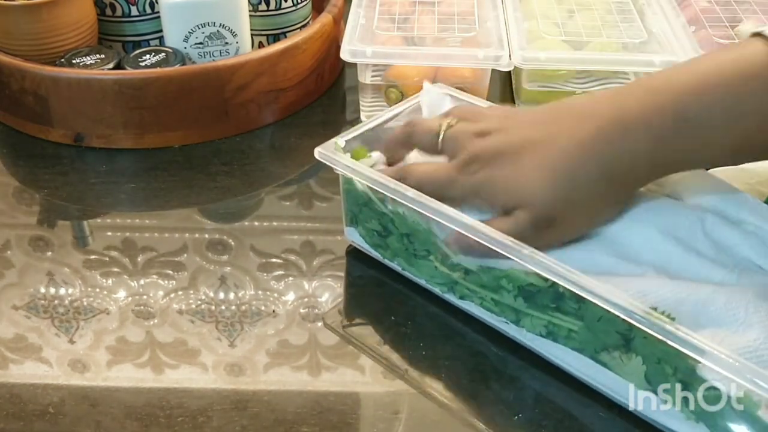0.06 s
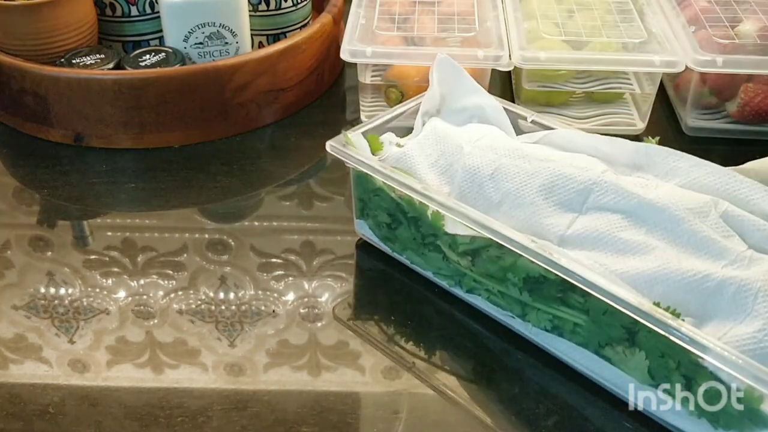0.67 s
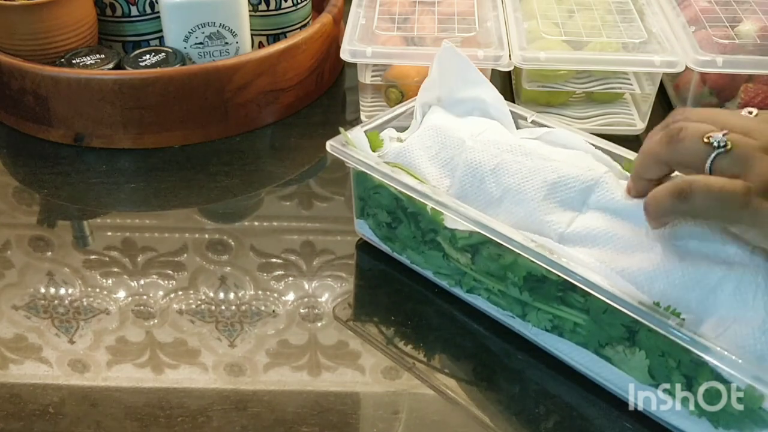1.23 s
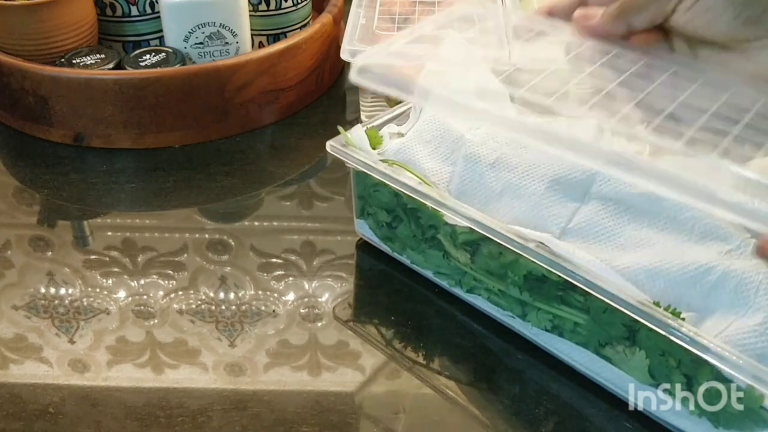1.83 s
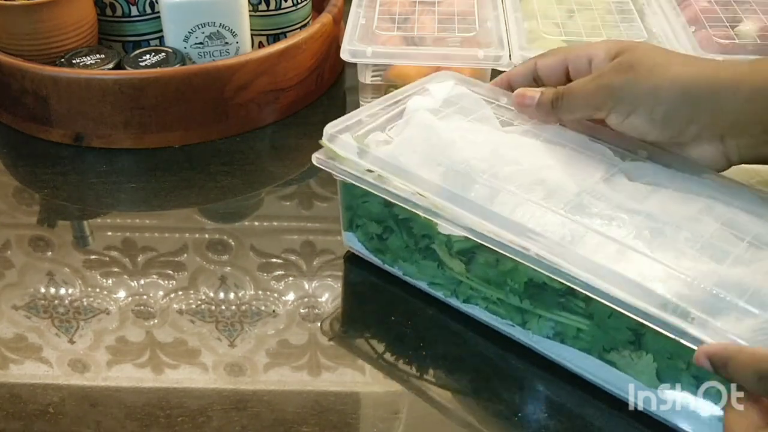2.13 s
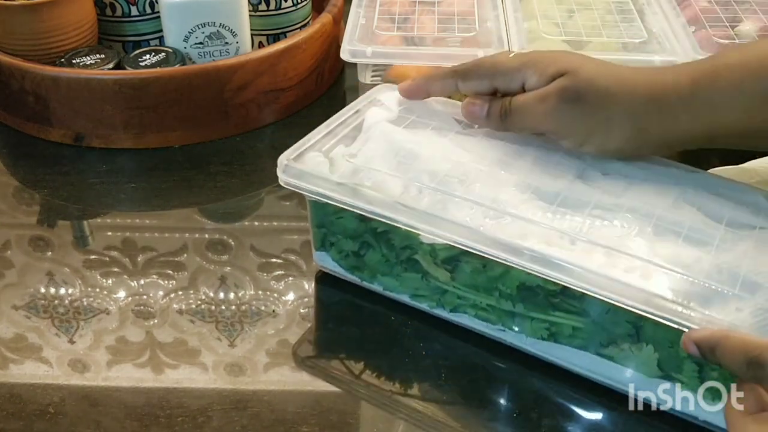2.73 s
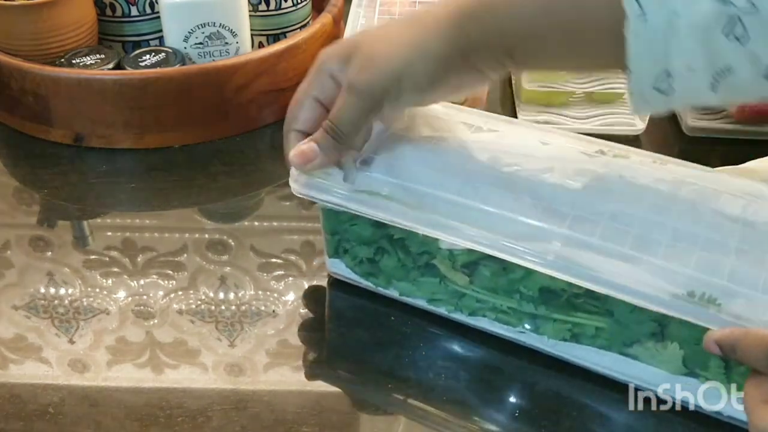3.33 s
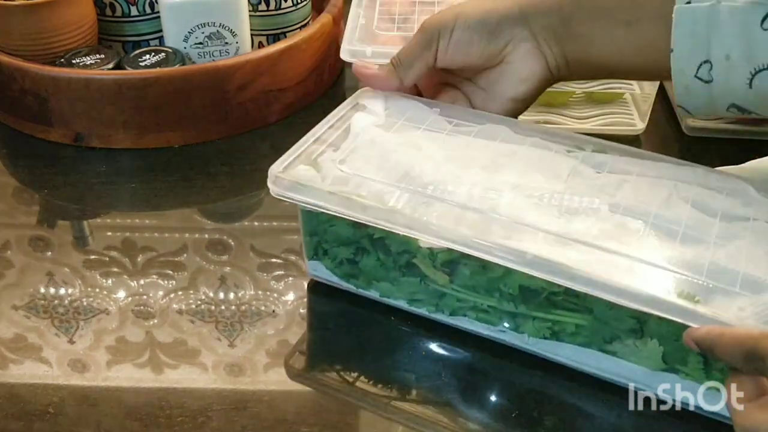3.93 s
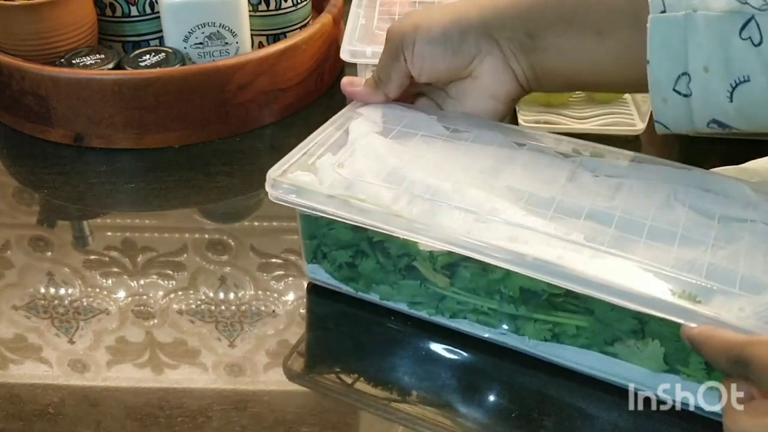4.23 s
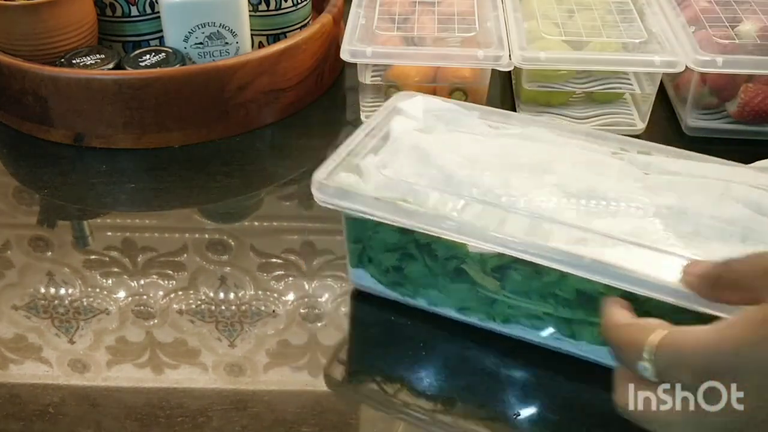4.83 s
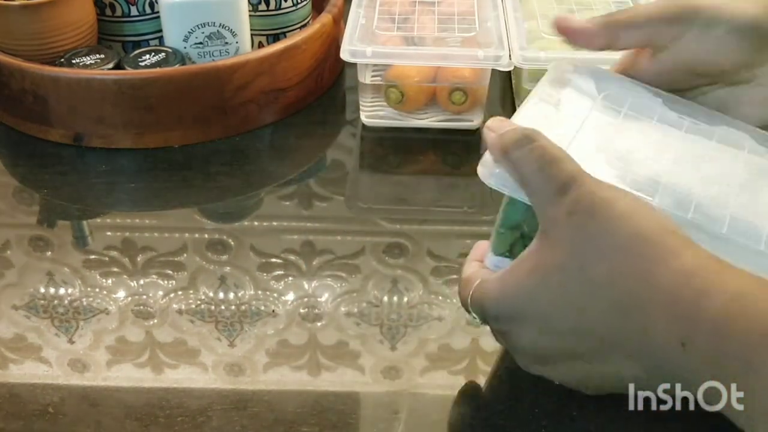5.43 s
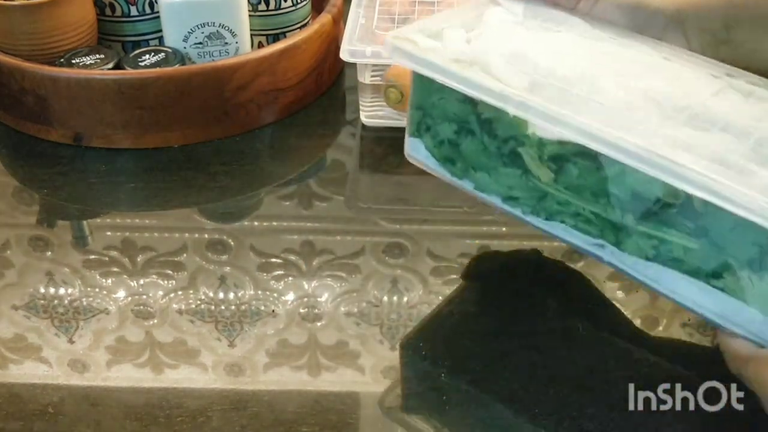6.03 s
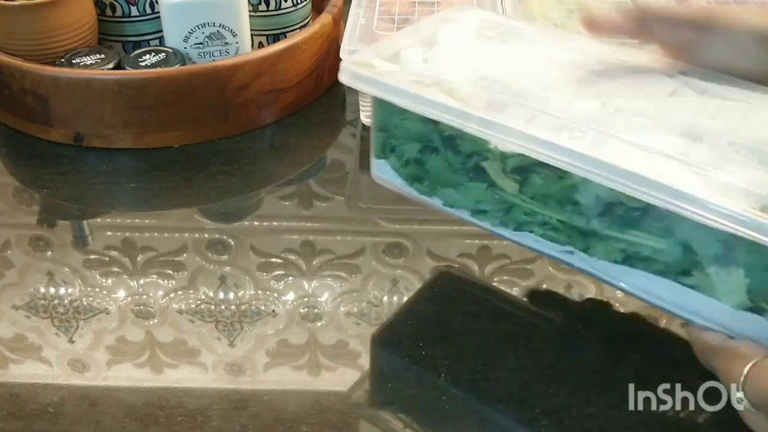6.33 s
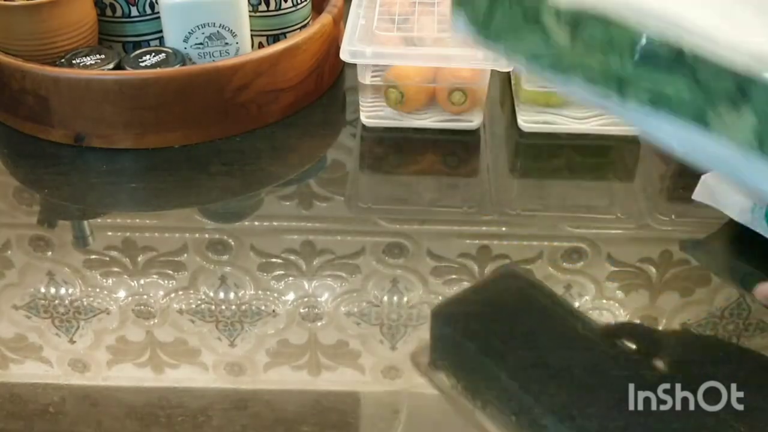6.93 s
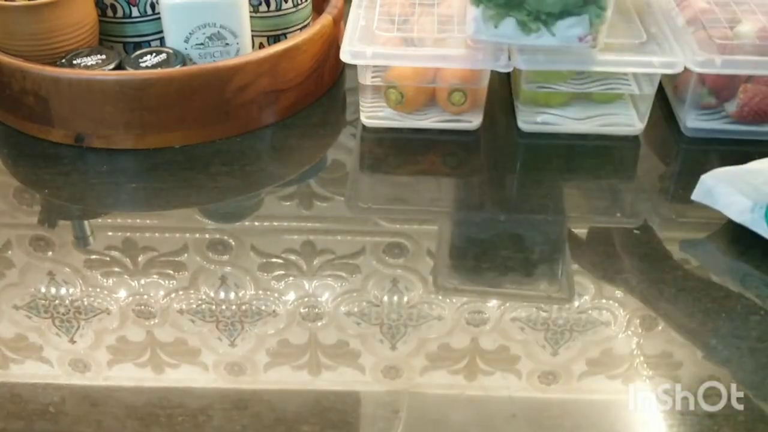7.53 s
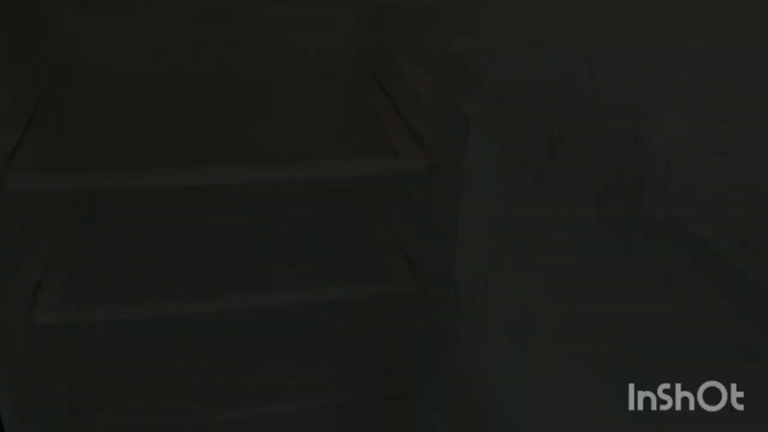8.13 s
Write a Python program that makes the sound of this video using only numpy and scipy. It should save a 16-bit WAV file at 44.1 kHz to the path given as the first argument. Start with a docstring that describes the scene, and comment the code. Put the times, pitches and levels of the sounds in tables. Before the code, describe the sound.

Paper towel rustles softly, then a thin plastic lid clacks and snaps shut on a box that is lifted and stacked.

```python
"""A small, quiet kitchen, with a thin plastic storage box on a glass table close to the microphones.
Hands smooth a paper towel over greens: tiny slips hiss in the paper and drum on the box.
They lay the lid on, snap its corners shut, lift the box and stack it on others. Each knock is a slip
of the rim that snaps, clacks and rings the same hollow walls. Handling rumbles, the room hums
faintly and echoes, and the sound fades out at the end."""
import sys
import numpy as np
from scipy import signal
from scipy.fft import rfft, irfft, next_fast_len
from scipy.io import wavfile
from scipy.ndimage import uniform_filter1d

SR = 44100
rng = np.random.default_rng(int(sys.argv[2]) if len(sys.argv) > 2 else 0)


def store_pcm(level_fs):
    """Save levels as 16-bit WAV."""
    pcm = np.round(np.clip(level_fs, -1, 1) * 32767).astype(np.int16)
    wavfile.write(sys.argv[1], SR, np.atleast_2d(pcm).T)


N = 360738


def amp(db):
    """Turns decibels (dB) into a number to multiply by."""
    return 10 ** (np.asarray(db) / 20)


def unit(x):
    """Scales a sound to an average (rms) level of 1."""
    return x / np.sqrt(np.mean(x ** 2) + 1e-20)


def unit_blow(x):
    """Gives a short sound the energy of 20 ms at level 1."""
    return unit(x) * np.sqrt(.02 * SR / x.shape[-1])


def read(points, hz):
    """Looks up a table by frequency, gliding between its rows."""
    f, value = np.transpose(points)
    return np.interp(np.log(hz + 1), np.log(f + 1), value)


def add(mix, s, sound):
    """Mixes in a stereo sound, starting at s seconds."""
    part = mix[:, max(round(s * SR), 0):][:, :sound.shape[-1]]
    part += sound[..., :part.shape[-1]]


def colour(x, points):
    """Shapes bass and treble to follow a table, without smearing sound earlier in time."""
    log_gain = np.log(amp(read(points, abs(np.fft.fftfreq(4096, 1 / SR)))))
    response = np.exp(np.conj(signal.hilbert(log_gain)))
    taps = np.fft.ifft(response).real[:2048]
    return signal.oaconvolve(x, taps[None], axes=1)[:, :x.shape[-1]]


def tilted(points, db_per_octave):
    """Makes a tone colour brighter or duller, leaving its lowest row as it is."""
    return [(f, db + db_per_octave * np.log2(f / points[0][0])) for f, db in points]


def swell(s, rise, fall, db):
    """A level that peaks at s seconds and is 13.5 dB lower one rise before and one fall after."""
    t = np.arange(0, N, 64) / SR - s
    gain = amp(db - 13.5 * np.maximum(-t / rise, t / fall) ** 2)
    return np.interp(np.arange(N) / SR - s, t, gain + 1e-9)


# How alike left and right are, for close sound and for sound from all around.
# Each row: frequency in Hz, likeness (1 is the same, 0 unrelated, -1 or less opposite).
NEAR = [(60, 0.6), (300, -1.3), (700, 0.69), (1500, 0), (4000, 0.12), (8000, 0.47)]
ALL_AROUND = [(60, .85), (290, .92), (450, .83), (640, 0.53), (1400, 0.019), (3000, 0.037)]

def noise(size, likeness):
    """An even hiss that reaches the two microphones partly alike."""
    padded = next_fast_len(size)
    left, other = rfft(rng.standard_normal((2, size)), padded)
    alike = np.clip(read(likeness, np.fft.rfftfreq(padded, 1 / SR)), -1, 1)
    right = alike * left + np.sqrt(1 - alike ** 2) * other
    return irfft([left, right], padded)[:, :size]


# The tone colour of the kitchen's still air. Each row: frequency in Hz, relative level in dB.
AIR = [(20, 3.5), (90, 0.5), (150, -9), (210, -1), (330, -3), (450, -9), (800, -9), (1600, -13),
       (4000, -16), (10000, -24), (15500, -30.5)]

def kitchen_air(level_db=-66.5):
    """The room's faint, steady hum and hiss."""
    return amp(level_db) * unit(colour(noise(N, ALL_AROUND), AIR))


def low_hum(hz=90.8):
    """A low tone swells briefly while the box is carried."""
    tone = unit(np.sin(2 * np.pi * hz * np.arange(N) / SR))
    return swell(s=6.98, rise=.25, fall=.08, db=-62.5) * tone


def ring(tones, t, pitch=1):
    """Struck tones die away, 60 dB in their ring time; neighbours start opposed, so the ring builds."""
    return sum((-1) ** k * amp(db - 60 * t / ring_s) * np.sin(2 * np.pi * f * pitch * t)
               for k, (f, db, ring_s) in enumerate(tones))


# How long the echo lasts. Each row: frequency in Hz, ring time in seconds.
ECHO_TIMES = [(100, 0.19), (400, 0.52), (1000, 0.3746), (2800, 0.43), (7000, 0.24), (11000, 0.43),
              (15000, 0.6)]
# The echo's tone colour. Each row: frequency in Hz, relative level in dB.
ECHO_COLOUR = [(60, -8), (150, 4.5), (400, 2), (1000, 1.5), (3000, 0), (8000, 5), (14000, -10.5)]
# Tones that linger in the room. Each row: pitch in Hz, relative level in dB, ring time in seconds.
ROOM_TONES = [(195, -2, .33), (341.8, -1, 0.3), (408, -0.5, .35), (585, -8.5, .3), (657, -4, 0.4),
              (751, -7, 0.38), (950, -11, .35), (1546, -13.5, .35), (1730, -11, .3)]

def room_echo(tones_db=-20, build_s=0.0056):
    """The room's answer to a click: many reflections blur together, and a few tones linger."""
    size = next_fast_len(SR * 3 // 4)
    hz, band_t, bands = signal.stft(noise(size, ALL_AROUND), SR, nperseg=256)
    bands = bands * amp(read(ECHO_COLOUR, hz)[:, None] - 60 * band_t / read(ECHO_TIMES, hz)[:, None])
    reflections = unit(signal.istft(bands, SR)[1][:, :size])
    t = np.arange(size) / SR
    tail = reflections + amp(tones_db) * unit(ring(ROOM_TONES, t))
    build_up = 1 - np.exp(-(t / build_s) ** 2)
    return unit(tail * build_up) / np.sqrt(size)


# Moves of the box. Each row: firmest moment, rise and fall in seconds, level in dB.
BOX_MOVES = [(1.575, 0.048, 0.031, -52.5), (2.1, 0.13, 0.14, -66), (5.08, .4, 0.34, -62),
             (6.95, .4, 0.22, -69.5), (7.549, 0.22, 0.16, -62)]
# The rumble's tone colour. Each row: frequency in Hz, relative level in dB.
RUMBLE_COLOUR = [(15, -15.5), (35, 0.5), (95, 1), (130, -4.5), (190, -19), (400, -38)]

def handling_rumble():
    """The box rumbles as it is pressed, carried and set down."""
    movement = sum(swell(*move) for move in BOX_MOVES)
    return movement * unit(colour(noise(N, ALL_AROUND), RUMBLE_COLOUR))


def tiny_slips(per_s, spread_db=3.2):
    """Fibres and skin slip in scattered clicks, a few of them large."""
    sizes = amp(spread_db * np.minimum(rng.exponential(1, N), 5))
    slipping = rng.random(N) < per_s / SR
    return noise(N, NEAR) * sizes * slipping


# Hand strokes over paper and plastic. Each row: firmest moment, rise and fall in seconds,
# then hiss level and drumming level in dB, before the trims below.
STROKES = [(0.09, .2, 0.27, -60.5, -62.5), (0.40, 0.085, 0.098, -63.5, -67.5),
           (0.725, .04, 0.082, -59, -71.5), (1.29, 0.54, 0.19, -69, -72.5), (1.605, 0.062, 0.087, -57, -61),
           (1.81, 0.062, 0.033, -57.5, -57.5), (2.02, 0.081, 0.087, -56.5, -53.5),
           (2.27, 0.13, 0.14, -66.5, -74), (2.64, 0.32, 0.069, -72.5, -66),
           (3.269, 0.053, 0.031, -54.5, -48.5), (4.34, 0.079, 0.054, -64, -61),
           (4.51, 0.096, 0.15, -60.5, -62), (4.84, 0.074, 0.15, -56, -58.5), (5.0, 0.055, 0.1, -67.5, -55),
           (6.02, 0.3, 0.079, -62, -63)]
# Tone colours of rubbed paper and rubbed box. Each row: frequency in Hz, relative level in dB.
PAPER_COLOUR = [(300, -29), (1000, 1.5), (2200, 4), (5000, -1), (7000, -9.5), (10000, -4.5), (12000, -15),
                (15500, -20)]
DRUM_COLOUR = [(100, -30), (220, -2.5), (380, -4), (560, -1), (800, -7.5), (1300, -13.5), (3000, -33)]

def rubbing(hiss_trim_db=-3.5, drum_trim_db=-3.0, scuff_db=3, scuff_s=0.018):
    """Fingers grip and slide unevenly; the slips hiss in the paper towel and drum on the box walls."""
    scuffs = amp(scuff_db * unit(uniform_filter1d(rng.standard_normal(N), round(scuff_s * SR))))
    on_paper = sum(swell(s, rise, fall, db + hiss_trim_db) for s, rise, fall, db, _ in STROKES)
    on_box = sum(swell(s, rise, fall, db + drum_trim_db) for s, rise, fall, _, db in STROKES)
    hiss = on_paper * unit(colour(tiny_slips(per_s=4000), PAPER_COLOUR))
    drumming = on_box * unit(colour(tiny_slips(per_s=740), DRUM_COLOUR))
    return scuffs * (hiss + drumming)


def slip_burst(t, slip_s, tone_colour, ring_s, rattle_db, rattle_s):
    """Tiny catches feed a burst of noise while the rim slips; a weaker rattle follows."""
    since_slip = np.maximum(t - slip_s, 0)
    rise = np.minimum(t / slip_s + 0.24, 1)
    fall = amp(-60 * since_slip / ring_s) + amp(rattle_db - 60 * since_slip / rattle_s)
    catches = amp(5.9 * unit(uniform_filter1d(rng.standard_normal(len(t)), size=24)))
    return unit_blow(colour(noise(len(t), NEAR) * rise * fall * catches, tone_colour))


# The stiff rim's tones. Each row: multiple of the rim pitch, relative level in dB, ring time in seconds.
RIM_TONES = [(.93, -0.5, .018), (1.06, -3.5, 0.026)]
# The clack's tone colour at the plain rim pitch. Each row: frequency in Hz, relative level in dB.
CLACK_COLOUR = [(300, -37), (600, 3.5), (900, 2), (1300, -5), (1750, -5), (2400, -8.5), (3200, -13.5),
                (5000, -43)]

def rim_clack(t, slip_s, push, rim_hz, plain_hz=940):
    """The rim clacks; a stiffer spot rings higher and carries the clack up with it."""
    tones = unit_blow(ring(RIM_TONES, t, rim_hz) * push)
    higher = rim_hz / plain_hz
    shifted = [(f * higher ** .75, db) for f, db in CLACK_COLOUR]
    tone_colour = tilted(shifted, db_per_octave=-np.log2(higher))
    burst = slip_burst(t, slip_s, tone_colour, ring_s=0.039, rattle_db=-14, rattle_s=0.15)
    return unit_blow(burst + amp(-6) * tones)


# The snap's tone colour, before it is tilted. Each row: frequency in Hz, relative level in dB.
SNAP_COLOUR = [(1500, -20.5), (3000, -1.5), (4500, 1), (6200, -2), (7400, -5), (9800, -2), (11500, -12),
               (15500, -32)]

def contact_snap(t, slip_s, hard_db):
    """A sharp snap at the point of contact: the harder the contact, the brighter it is."""
    tone_colour = tilted(SNAP_COLOUR, db_per_octave=-2.2 + 0.1349 * hard_db)
    return slip_burst(t, slip_s, tone_colour, ring_s=0.014, rattle_db=-6, rattle_s=0.067)


# The hollow box on its support. Each row: pitch in Hz, relative level in dB, ring time in seconds.
BOOM_TONES = [(55, -26, 0.078), (111.7, -17, 0.085), (193, 3.5, 0.026), (214, 3.5, 0.044)]

def knock(strength_db, hard_db, boom_db, wall_hz, rim_hz, slip_s, wall_tones):
    """One slip of the rim gives a low boom, the ring of the walls, a clack and a snap."""
    t = np.arange(SR // 8) / SR
    push = 1 - np.exp(-t / (.5 * slip_s))  # the walls start moving while the rim slips
    boom = amp(boom_db) * unit_blow(ring(BOOM_TONES, t) * push)
    walls = unit_blow(ring(wall_tones, t, wall_hz) * push)
    clack = amp(2.7 + 0.5025 * hard_db) * rim_clack(t, slip_s, push, rim_hz)
    snap = amp(hard_db) * contact_snap(t, slip_s, hard_db)
    return amp(strength_db) * (boom + walls + clack + snap)


# The box walls' tones. Each row: multiple of the wall pitch, relative level in dB, ring time in seconds.
WALL_TONES = [(.76, 1.5, 0.046), (1, 3.5, .045), (1.27, -0.5, .035), (1.62, -4, 0.056), (2.3, -14.5, 0.024)]
# Knocks and snaps. Each row: start in seconds, strength in dB, hardness and boom in dB relative to the
# strength, wall pitch and rim pitch in Hz, slip length in seconds, level sent to the echo in dB.
KNOCKS = [(0.186, -56.5, 7.5, -3.5, 417, 1610, 0.0013, -13),
          (0.793, -41.5, -19, -30.5, 326, 846, 0.0048, -2),
          (0.816, -58.5, 13, -0.5, 460, 2260, 0.0046, -4.5), (0.839, -52, -4, -9, 400, 2080, 0.0085, -1.5),
          (0.877, -35.5, -12, -9, 327, 930, 0.0025, -1.5), (0.8891, -47, 18, -7, 330, 2390, 0.00078, -7.5),
          (1.519, -69, 0, 6, 293, 2700, 0.0031, -5), (2.028, -51.5, -3, -12, 434, 1690, 0.0053, -15),
          (2.034, -38.5, -6, -21, 454, 795, 0.0038, -2),
          (2.040, -32.5, -10.5, -8, 480, 853, 0.00073, -12.5),
          (2.047, -37, -15, -6, 442, 1450, 0.0021, -7.5), (2.181, -45, -20.5, -16, 490, 780, 0.0028, -11),
          (2.282, -80, 15, -4, 480, 2550, 0.00046, -16), (2.307, -73.5, 6.5, -7, 448, 1690, .0006, 0),
          (2.668, -48.5, -12.5, -14.5, 483, 980, 0.0024, -5.5),
          (2.723, -53, -20, -3.5, 419, 1230, .005, -10), (2.873, -46.5, -3, -5.5, 411, 890, 0.0058, -6),
          (2.881, -36.5, -9.5, -23, 431, 850, 0.0005, -14.5),
          (3.085, -60.5, -1.5, -7, 460, 2780, 0.0021, -1), (3.183, -52, -15.5, -10, 473, 1140, 0.0035, -5),
          (3.282, -54, -4, -14, 484, 810, 0.0013, -10), (3.504, -54.5, -14, -14, 445, 855, 0.0012, -1.5),
          (3.577, -18, -11.5, -5.5, 326.6, 988, 0.0021, -11.5),
          (3.5785, -30, -6.5, -7.5, 346.3, 2820, 0.00076, -11),
          (3.5805, -22, -30.5, -9, 527, 1240, 0.0026, -3), (3.714, -52.5, 0.5, -11, 460, 850, .0007, -3.5),
          (3.752, -56.5, -0.5, 2, 385, 870, .0005, -4), (3.842, -62.5, 0.5, 8.5, 400, 854, .0006, -4),
          (4.06, -36, -29.5, -4.5, 354, 794, 0.0013, -10),
          (4.481, -58.5, -0.5, -24.5, 445, 1810, .003, -17), (4.661, -62, -7, -13, 368, 983, 0.0023, -12.5),
          (4.83, -54.5, -0.5, -8.5, 398, 2110, 0.00045, -13.5),
          (4.895, -43.5, -12.5, -10, 475, 1665, 0.00028, -10),
          (4.996, -56.5, -6, -5, 368, 1350, 0.0018, -11), (5.11, -52, -18, -11, 352, 830, 0.0023, 0.5),
          (5.16, -41.5, -25, -8, 367, 980, 0.0095, -5.5), (5.17, -51.5, 8.5, -17, 355, 940, .0006, -4.5),
          (5.176, -39, -10, -5, 382, 840, 0.0032, -14.5), (5.41, -31, -23.5, -9.5, 431, 1017, 0.00079, -13),
          (5.703, -23, -18.5, -13.5, 439, 842, 0.0042, 1.5),
          (5.715, -27, -18, -12.5, 434, 840, 0.0019, -32),
          (5.867, -37.5, -15.5, -6.5, 326, 1830, 0.0011, -11.5),
          (6.107, -49.5, -10, -2.5, 368, 1730, 0.0042, -20), (6.116, -43, -13, -15, 373, 1620, .003, -7),
          (6.358, -43.5, -19, -11.5, 442, 924, 0.002, -7.5),
          (6.5056, -27, -3, -17.5, 463, 2194, 0.0013, -10.5),
          (6.568, -21.5, -9, -13, 391.5, 1860, 0.00071, -8),
          (7.2633, -39.5, -14, -0.5, 324.4, 1090, 0.0023, -5.5),
          (7.393, -57, -20.5, -7.5, 288, 1050, 0.00066, 0), (7.514, -49, -6, -6.5, 377, 1547, 0.0074, -5),
          (7.527, -35, -4.5, 0, 290, 1141, 0.0028, -17.5), (7.553, -43.5, -10, -3, 322, 817, 0.0043, -3)]

def box_knocks(echoes, lifted_from_s=5.6, lifted_to_s=7.1, lifted_db=2, lifted_ring_s=0.059):
    """Lid and box knock and snap; off the table, the main wall tone is louder and rings longer."""
    out = np.zeros((2, N))
    low, (multiple, db, _), *high = WALL_TONES
    lifted_tones = [low, (multiple, db + lifted_db, lifted_ring_s), *high]
    for k, (s, *blow, echo_db) in enumerate(KNOCKS):
        sound = knock(*blow, lifted_tones if lifted_from_s < s < lifted_to_s else WALL_TONES)
        echo = echoes[k % len(echoes)]  # the room answers each spot differently
        add(out, s, sound)
        add(out, s, amp(echo_db) * signal.fftconvolve(sound, echo, axes=1))
    return out


def scene(knock_echo_db=-3.5, rub_echo_db=-5.5):
    """Knocks and rubbing, heard close up and as echoes, over the quiet background."""
    echoes = [room_echo() for _ in range(6)]
    knocks = box_knocks([amp(knock_echo_db) * echo for echo in echoes])
    background = handling_rumble() + low_hum() + kitchen_air()
    rub = rubbing()
    rub_echo = amp(rub_echo_db) * signal.oaconvolve(rub, echoes[0], axes=1)[:, :N]
    return background + rub + rub_echo + knocks


# The microphones' weak deep bass. Each row: frequency in Hz, level change in dB.
BASS_CUT = [(15, -10.5), (40, -7), (80, -1), (130, 2), (180, 0.5)]
# How the two microphones differ. Each row: frequency in Hz, left level minus right level in dB.
BALANCE = [(60, -2.5), (150, -3.5), (350, -5), (700, -4), (1300, -1.5), (2500, -1.5), (4500, -0.5),
           (8000, -6), (12000, -4.5)]

def record(dry, top_hz=15800):
    """Two unlike microphones thin the bass; the sound fades at the end and the top treble is cut."""
    left_db = read(BALANCE, np.fft.rfftfreq(N, 1 / SR)) / 2
    heard = irfft(rfft(colour(dry, BASS_CUT)) * amp([left_db, -left_db]), N)
    fade = amp(np.interp(np.arange(N) / SR, [7.7, 8.0, 8.15], [0, -8, -22]))
    treble_cut = signal.firwin(511, top_hz, window=("kaiser", 9), fs=SR)
    return signal.oaconvolve(heard * fade, treble_cut[None], "same")


dry = scene()
out = record(dry)
store_pcm(out)
```